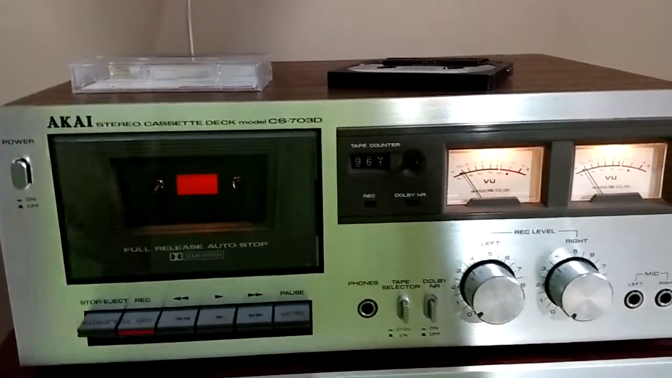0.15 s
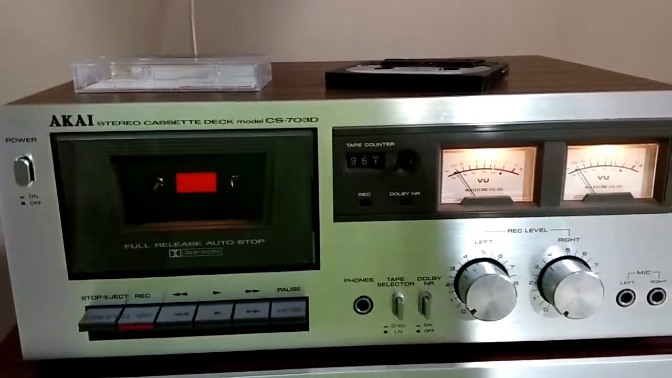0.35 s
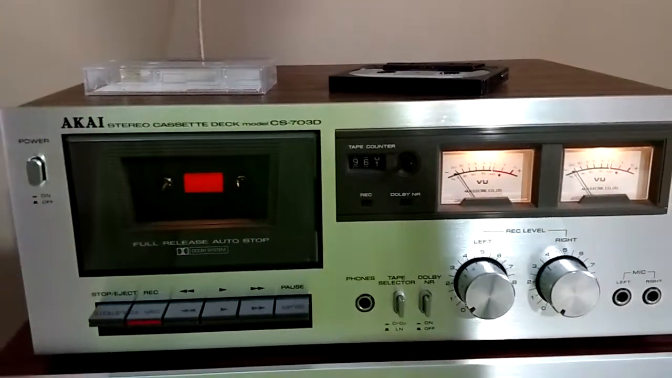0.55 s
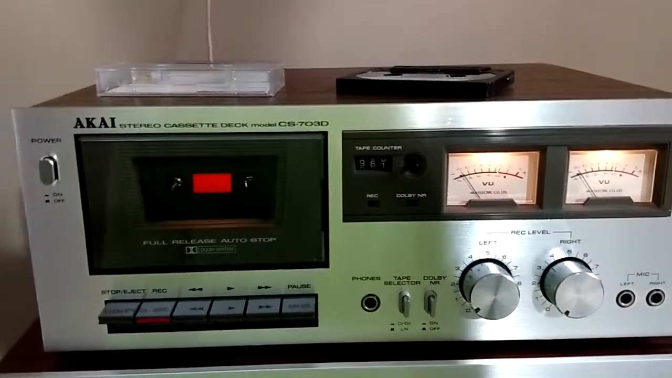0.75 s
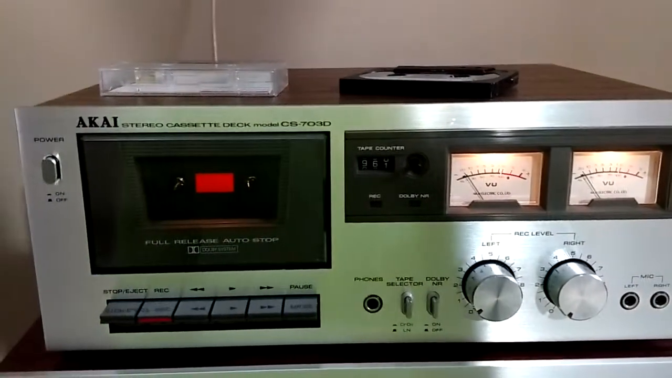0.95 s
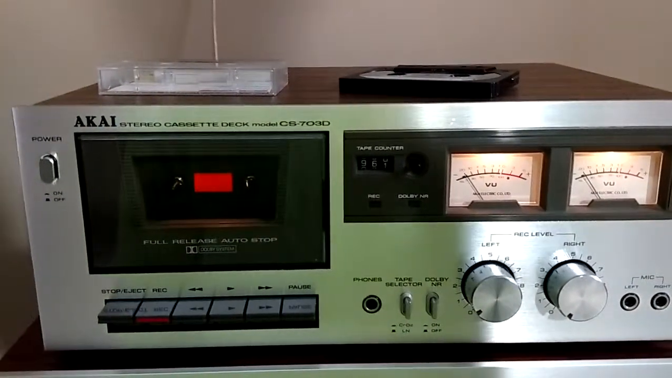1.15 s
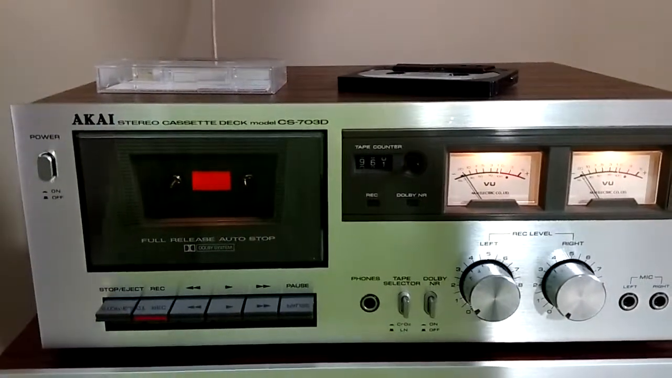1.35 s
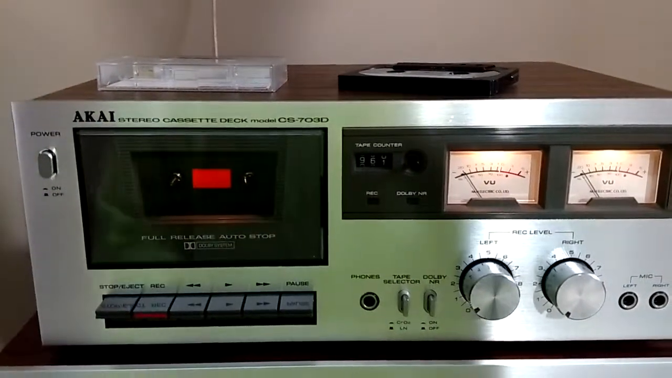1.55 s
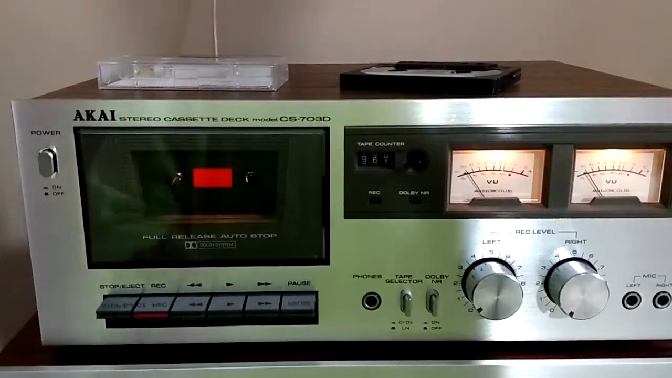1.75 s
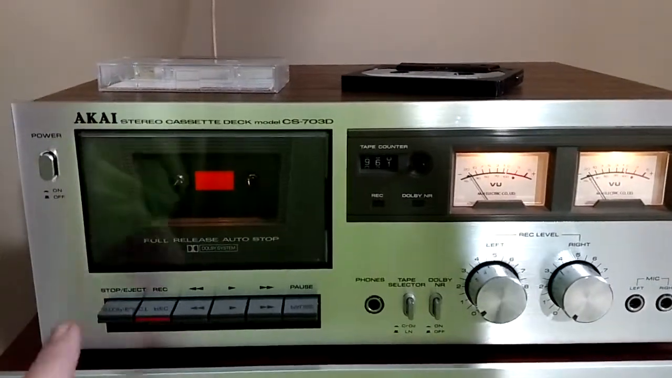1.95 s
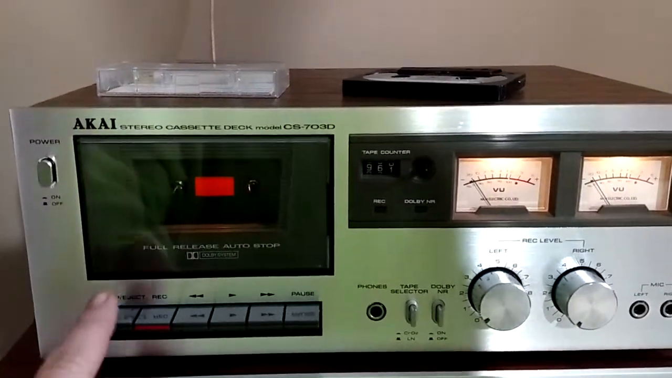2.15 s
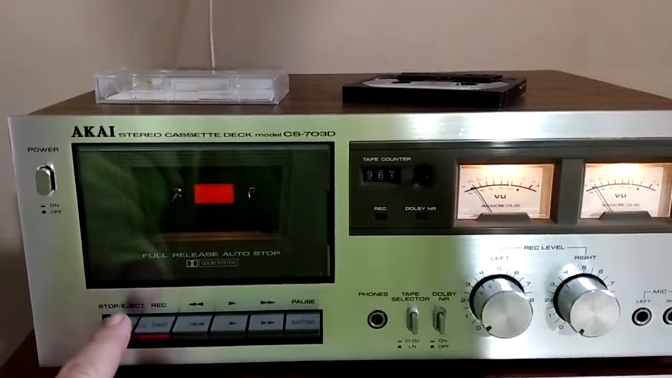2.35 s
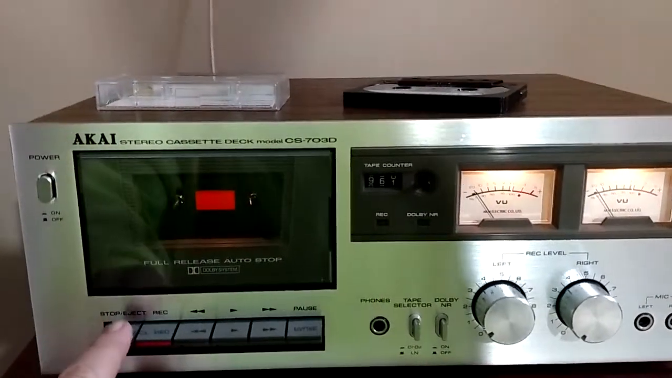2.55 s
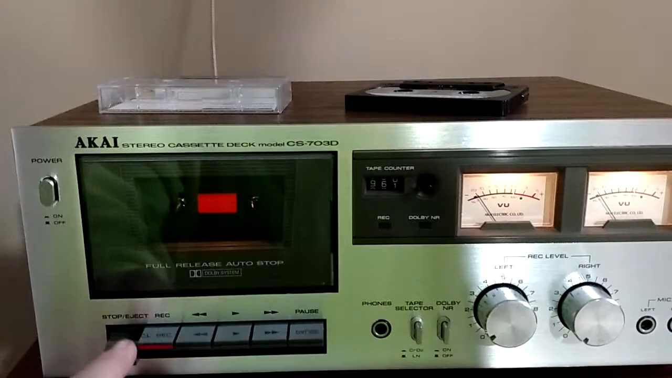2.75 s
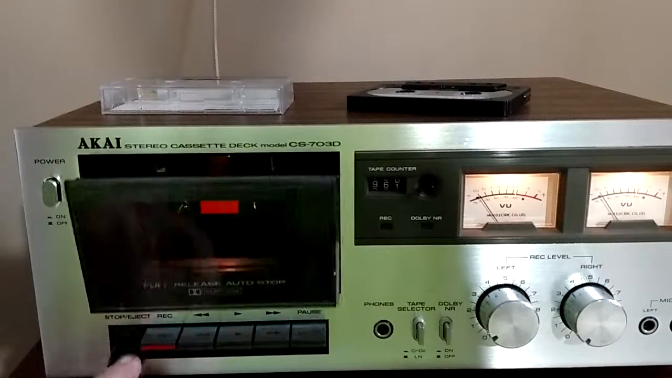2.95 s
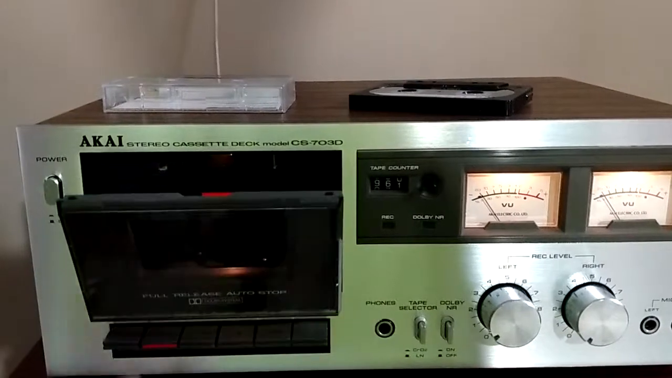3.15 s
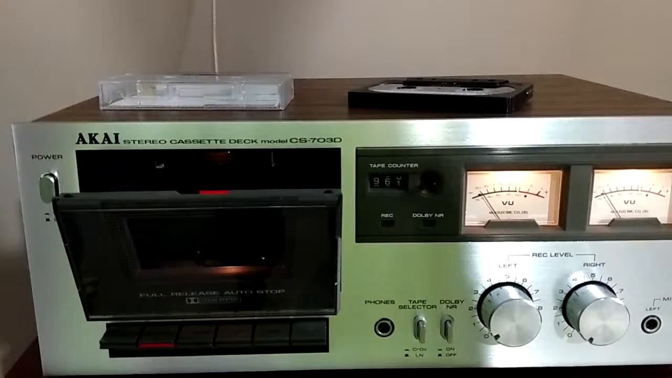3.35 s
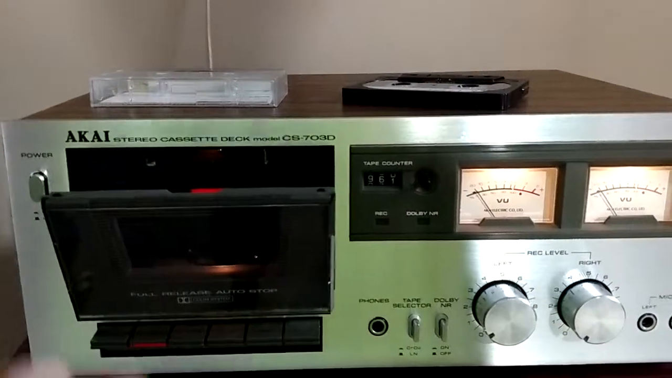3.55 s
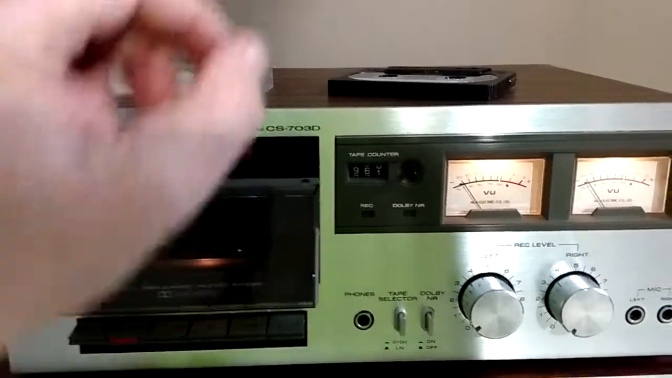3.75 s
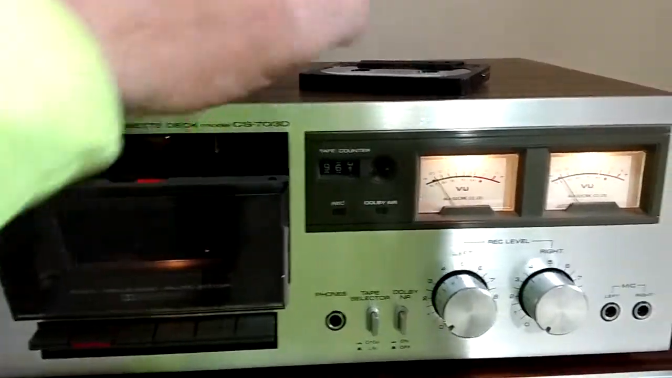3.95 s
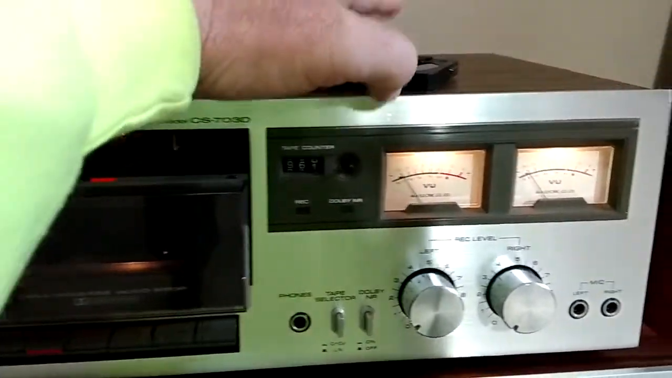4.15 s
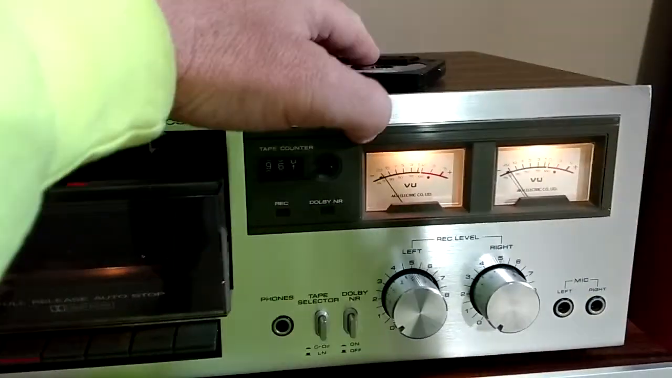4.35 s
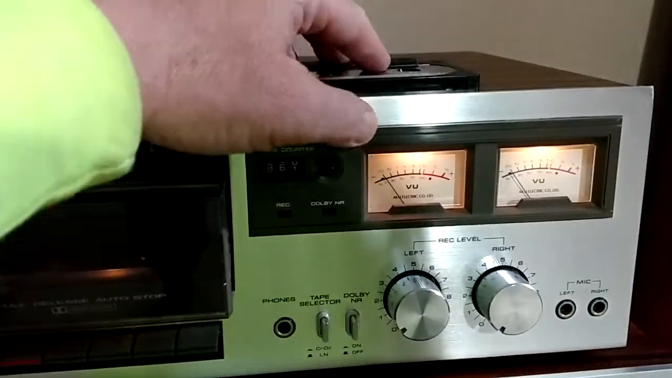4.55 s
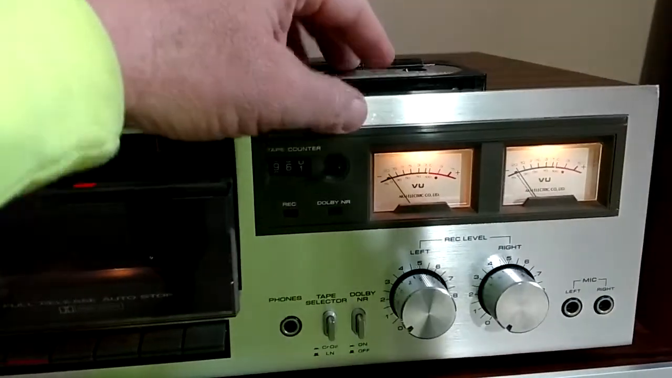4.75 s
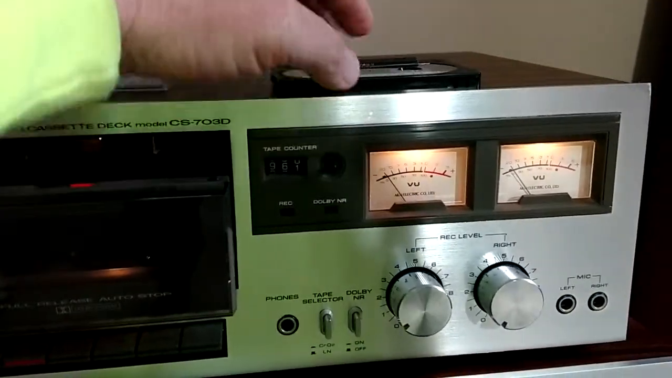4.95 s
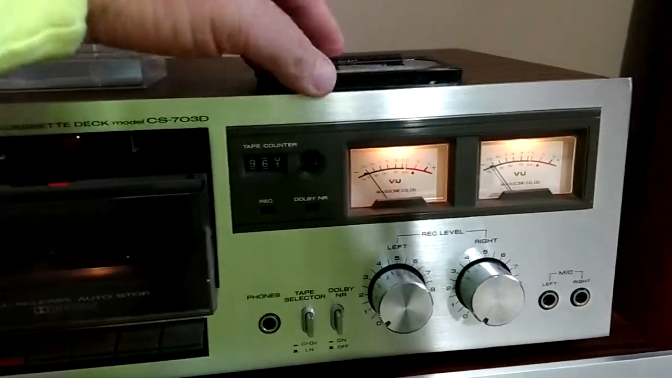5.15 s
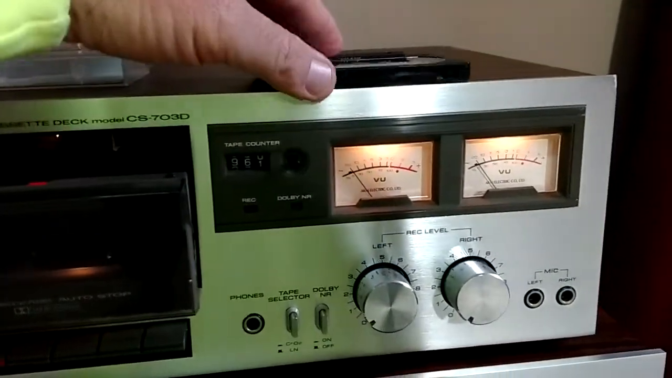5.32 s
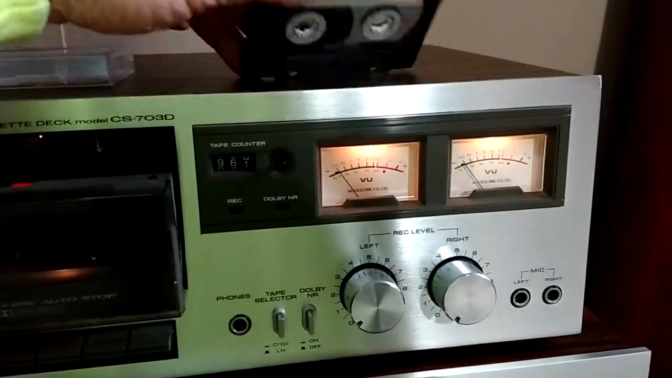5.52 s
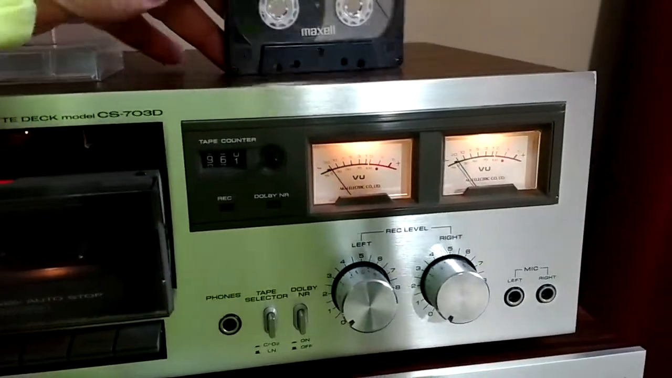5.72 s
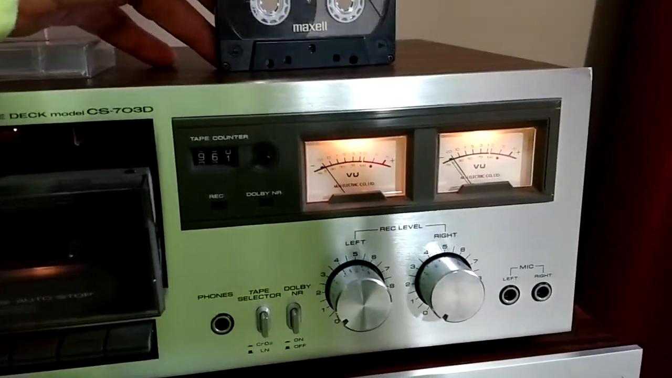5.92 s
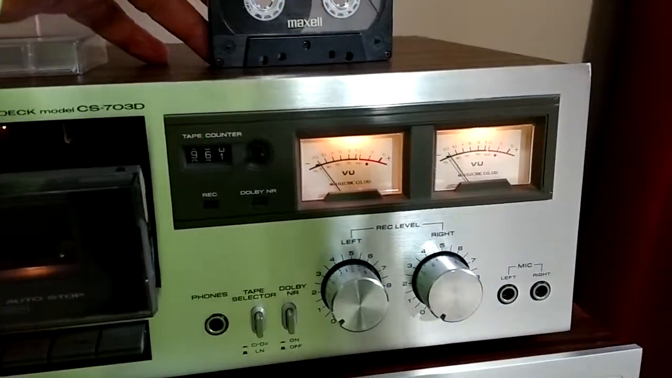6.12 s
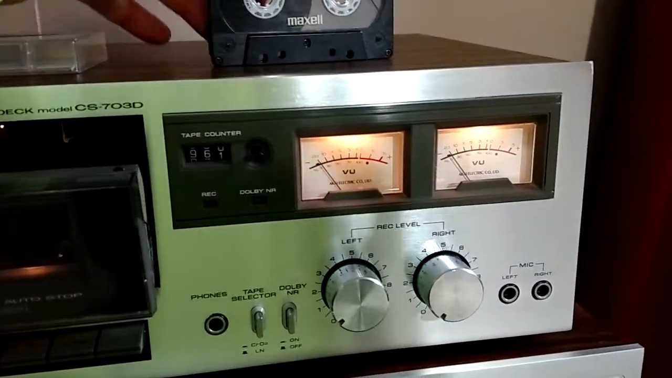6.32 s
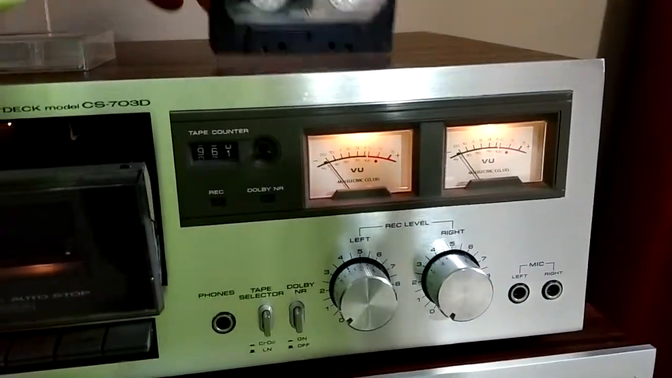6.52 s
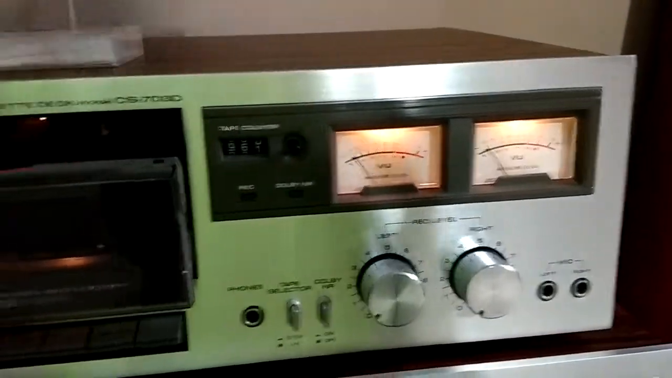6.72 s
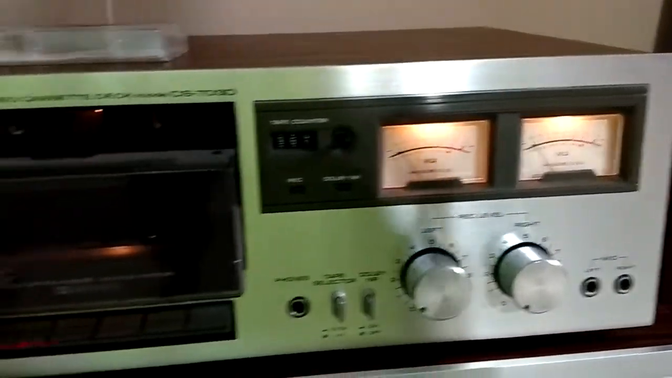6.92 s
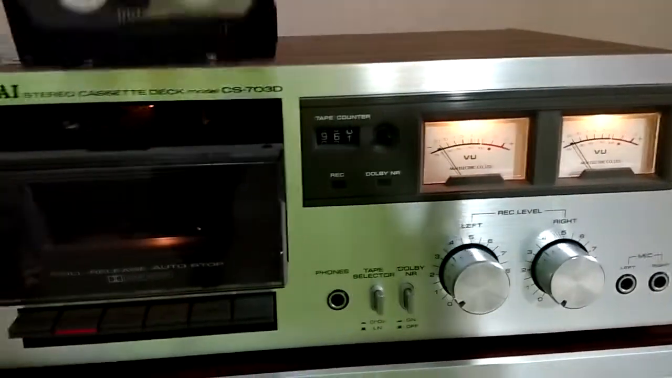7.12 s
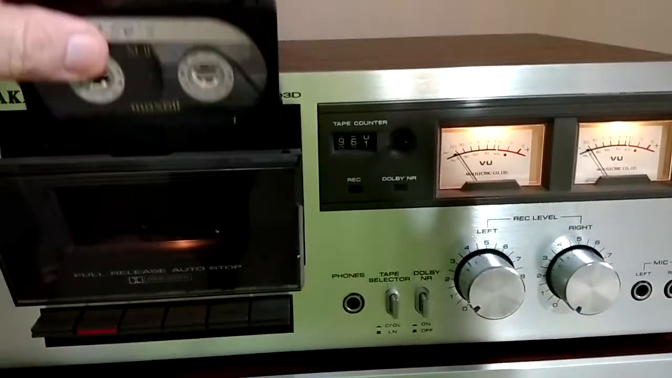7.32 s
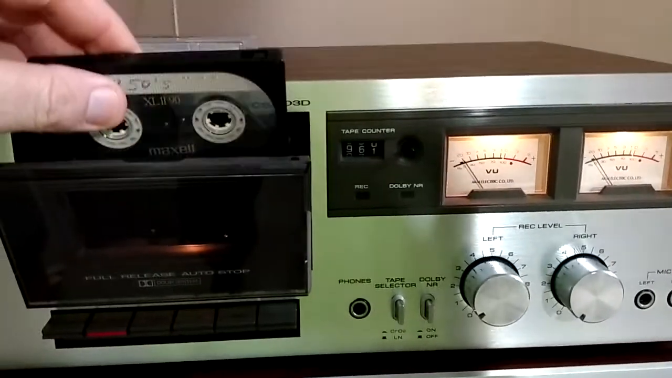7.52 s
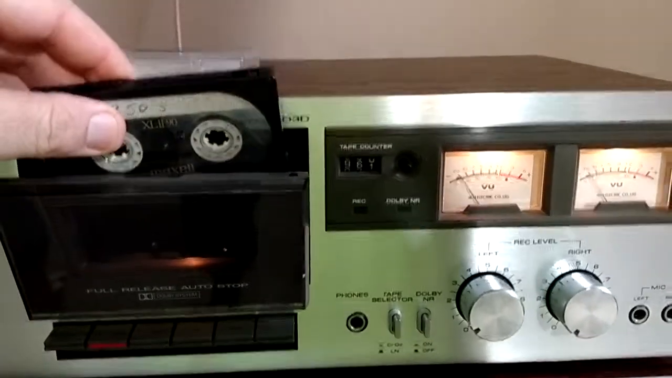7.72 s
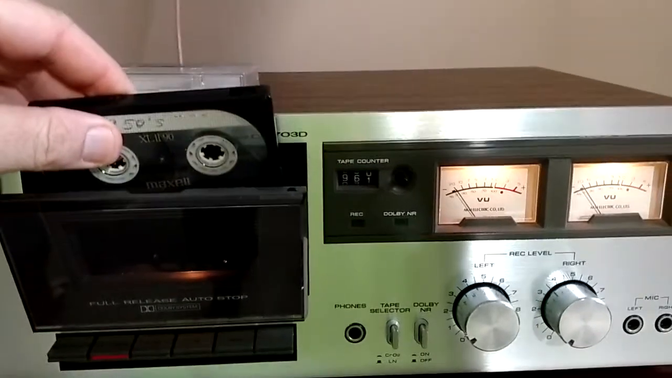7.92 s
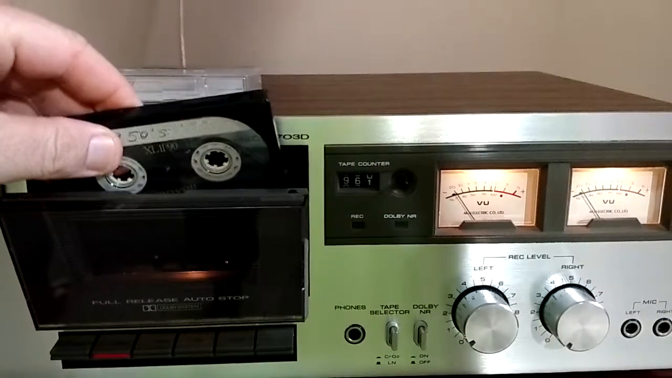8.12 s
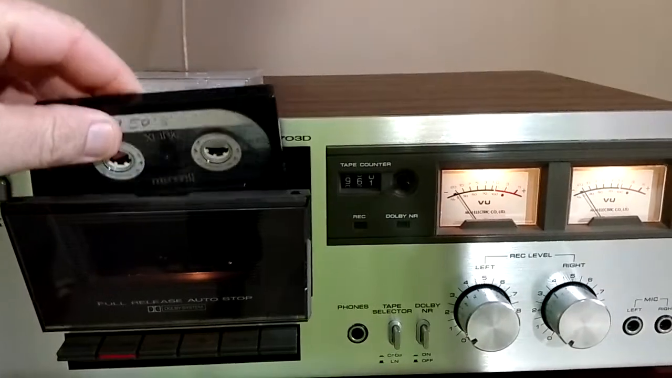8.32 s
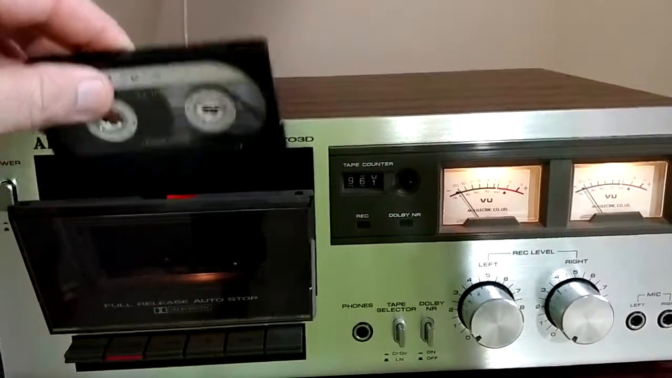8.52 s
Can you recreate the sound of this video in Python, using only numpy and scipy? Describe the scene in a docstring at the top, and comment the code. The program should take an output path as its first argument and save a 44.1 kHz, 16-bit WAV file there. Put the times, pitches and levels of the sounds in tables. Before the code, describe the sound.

Close, small indoor recording with soft air hiss and low hum. After nearly three quiet seconds a key clicks and a spring-loaded door clacks open sharply. A plastic box and cassette then knock and scrape loudly on the wooden cabinet top, followed by softer dull taps as the cassette rocks upright. After a short pause, it rattles and clicks lightly against the door guides.

```python
"""A quiet room with a tape deck: a key is pressed and the door drops open, a hand slides a box and a cassette
over the wooden top, rocks the cassette upright, then feeds it into the door. Air hiss and a low hum lie below.
Blows are grain bursts ringing modes, scrapes and rattling tails are grain streams, the background is shaped
noise and sines. Two microphone ports a hand's width apart are subtracted from each other to aim left and right."""
import sys
import numpy as np
from scipy import signal
from scipy.fft import rfft, irfft
from scipy.io import wavfile

SR = 44100
rng = np.random.default_rng(int(sys.argv[2]) if len(sys.argv) > 2 else 0)


def to_wav(s):
    """Save 16-bit WAV."""
    ch = np.atleast_2d(s).T  # columns
    pcm = np.round(np.clip(ch, -1, 1) * 32767)  # PCM
    wavfile.write(sys.argv[1], SR, pcm.astype(np.int16))


N = 378378
HZ = np.maximum(np.fft.rfftfreq(N, 1 / SR), 1)
TIME = np.arange(N) / SR


def amp(db):
    """Gain of a level in dB."""
    return 10 ** (np.asarray(db, float) / 20)


def rms_one(x):
    """Scaled to rms 1."""
    return x / np.sqrt(np.mean(x ** 2) + 1e-20)


def in_time(rows):
    """Columns of a table as straight-line curves over all samples."""
    s, *columns = np.transpose(rows)
    return np.array([np.interp(TIME, s, column) for column in columns])


def swell(start_s, rise_s, hold_s, fall_s):
    """Straight rise, hold and fall between 0 and 1."""
    corners_s = start_s + np.cumsum([0, rise_s, hold_s, fall_s])
    return np.interp(TIME, corners_s, [0, 1, 1, 0])


def coloured(spectrum, channels=1):
    """Steady noise of a given spectrum, rms 1."""
    hz, db = np.transpose(spectrum)
    shape = amp(np.interp(np.log(HZ), np.log(hz), db))
    white = rng.standard_normal((channels, N))
    return rms_one(irfft(rfft(white) * shape, N))


# Hiss of the air. Each row: time in seconds, level in dB.
AIR_LEVEL = [(0, -64.5), (.6, -64), (1.3, -68), (2.3, -70.5), (2.9, -66.5), (3.3, -66), (4.1, -63.5),
             (4.8, -62.5), (5.6, -61.5), (6.5, -65), (7.3, -68), (8.58, -61)]
# Hiss spectrum at each port. Each row: frequency in Hz, density in dB per Hz.
AIR_SPECTRUM = [(30, -12.5), (50, -18.5), (80, -0.5), (125, -2), (200, 2.5), (320, -2.5), (550, -0.5),
                (1000, -2.5), (1700, -5), (3000, -8.5), (5500, -9), (8500, -9), (12000, -10),
                (16000, -10.5)]


def air():
    """Hiss of the air, independent at each port."""
    air_db, = in_time(AIR_LEVEL)
    return amp(air_db) * coloured(AIR_SPECTRUM, channels=2)


# Rumble spectrum. Each row: frequency in Hz, density in dB per Hz.
RUMBLE_SPECTRUM = [(30, -34), (50, -2.5), (78, 5.5), (100, -1), (122, -6.5), (170, -16.5), (255, 4.5),
                   (330, -5), (500, -5.5), (900, -51)]
RUMBLE_DB, RUMBLE_FOLLOWS = -77.5, 1.3   # level at mean hiss; dB of swing per dB of hiss swing


def rumble():
    """Low noise, alike at both ports, that swings with the hiss."""
    air_db, = in_time(AIR_LEVEL)
    rumble_db = RUMBLE_DB + RUMBLE_FOLLOWS * (air_db - air_db.mean())
    return amp(rumble_db) * coloured(RUMBLE_SPECTRUM)


# Low background. Each row: time in seconds, drone level in dB, hum level in dB.
BACKGROUND_LEVELS = [(0, -84, -76.5), (1.3, -92.5, -84), (2.4, -83, -88), (3.1, -73.5, -88),
                     (4.3, -73, -86), (4.7, -75, -72), (5.5, -76, -66), (6.1, -71, -69),
                     (7.3, -72.5, -67.5), (7.8, -67.5, -63), (8.58, -63, -66)]
# Drone spectrum. Each row: frequency in Hz, density in dB per Hz.
DRONE_SPECTRUM = [(95, -35), (118, -5.5), (140, -5), (170, 0.5), (200, -9), (250, 0), (300, -57)]
# Hum partials. Each row: frequency in Hz, relative level in dB.
HUM_PARTIALS = [(124, 1), (248, -9), (366, -16.5)]


def drone_and_hum():
    """Narrow low noise plus steady sine partials, alike at both ports."""
    drone_db, hum_db = in_time(BACKGROUND_LEVELS)
    hum = sum(amp(db) * np.sin(2 * np.pi * hz * TIME) for hz, db in HUM_PARTIALS)
    return amp(drone_db) * coloured(DRONE_SPECTRUM) + amp(hum_db) * hum


# Faint high whine. Each row: time in seconds, frequency in Hz, level in dB.
WHINE = [(0, 11050, -86), (1.2, 10900, -88), (2.5, 10600, -91), (5, 10400, -87), (8.58, 10350, -89)]


def whine():
    """A thin high tone whose strength wavers at random, independently at each port."""
    hz, db = in_time(WHINE)
    waver = coloured([(1, -5), (60, -2.0), (150, -33.0), (400, -72.5)], channels=2)   # (Hz, dB per Hz)
    return amp(db) * waver * np.sin(2 * np.pi * np.cumsum(hz) / SR)


def ring(force, hz, t60_s):
    """One mode: a unit click sets a decaying sine of height 1 ringing."""
    r, w = amp(-60 / (t60_s * SR)), 2 * np.pi * hz / SR
    return signal.lfilter([0, np.sin(w)], [1, -2 * r * np.cos(w), r * r], force + 1e-18)


GRAINS_PER_S, GRAIN_SPREAD_DB = 3000, 4


def grains(size):
    """Tiny uneven impacts at random moments, rms 1."""
    sizes = amp(GRAIN_SPREAD_DB * np.minimum(rng.exponential(1, size), 4))
    signed = sizes * rng.choice([-1, 1], size)
    return rms_one(signed * (rng.random(size) < GRAINS_PER_S / SR))


def band(x, low_hz, high_hz):
    """Band-pass that keeps the rms of white noise."""
    sos = signal.butter(2, [low_hz, high_hz], "band", fs=SR, output="sos")
    return signal.sosfilt(sos, x) * np.sqrt(SR / 2 / (high_hz - low_hz))


def resonances(x, peaks):
    """Parallel broad resonances, scaled so that white noise about keeps its rms."""
    out = 0
    for k, (hz, width_hz, db) in enumerate(peaks):
        r, w = np.exp(-np.pi * width_hz / SR), 2 * np.pi * hz / SR
        peak = signal.lfilter([1 - r * r, 0, r * r - 1], [1, -2 * r * np.cos(w), r * r], x)
        out = out + (-1) ** k * amp(db) * peak
    power = sum(2 * np.pi * amp(db) ** 2 * width_hz * 2 / SR for hz, width_hz, db in peaks)
    return out / np.sqrt(power)


SPOT_DB_PER_OCTAVE, MODE_SPREAD_DB = 9.5, 1
RISE_S = 0.00044


def spot_gain(hz, db, spot_hz):
    """Modes near the pitch of the touched spot are driven most."""
    return amp(db - SPOT_DB_PER_OCTAVE * np.abs(np.log2(hz / spot_hz)))


def blows(hits, modes, levels_db, spots_hz, grip):
    """Each blow is a short rattle that swells and dies, ringing the modes of the struck body."""
    out, span_s = np.zeros(N + SR), np.arange(SR // 4) / SR
    for (s, *_, rattle_s), level_db, spot_hz in zip(hits, levels_db, spots_hz):
        force = grains(len(span_s)) * np.exp(-span_s / rattle_s) * (1 - np.exp(-span_s / RISE_S))
        force[:8] += np.hanning(8) * 1.48   # first contact
        chance = amp(rng.normal(0, MODE_SPREAD_DB, len(modes))) * rng.choice([-1, 1], len(modes))
        body = sum(own * spot_gain(hz, db, spot_hz) * ring(force, hz, t60_s)
                   for own, (hz, db, t60_s) in zip(chance, modes))
        body = body * np.exp(-span_s / (grip * rattle_s))   # fingers and guides damp the ring
        fade = np.cos(2 * np.pi * span_s)   # reaches 0 at the end of the span
        out[round(s * SR):][:len(span_s)] += amp(level_db) * body / np.abs(body).max() * fade
    return out[:N]


# Broad upper resonances of thin plastic. Each row: frequency in Hz, width in Hz, level in dB.
CLICK_PEAKS = [(2310, 1400, -1), (3520, 774, 1), (4164, 1010, -2), (5100, 820, -3.5), (5595, 590, -11.5)]
# The same, higher up. Each row: frequency in Hz, width in Hz, level in dB.
TICK_PEAKS = [(6790, 890, 0.5), (9270, 1400, 6), (10300, 2740, 2.5), (11800, 1200, 3.5), (14200, 4400, -6)]


def cracks(hits):
    """The bright edge of each blow: noise dying with the rattle, in a click band and a tick band."""
    click, tick, span_s = np.zeros(N + SR), np.zeros(N + SR), np.arange(SR // 8) / SR
    for s, level_db, _, click_db, tick_db, _, rattle_s in hits:
        part = slice(round(s * SR), round(s * SR) + len(span_s))
        click[part] += amp(level_db + click_db - 1.5) * np.exp(-span_s / (0.00039 + 0.49 * rattle_s))
        tick[part] += amp(level_db + tick_db - 6) * np.exp(-span_s / (0.0023 + 0.27 * rattle_s))
    rough = 3.06 * rng.standard_normal(N) + 1.58 * grains(N)
    return resonances(click[:N] * rough, CLICK_PEAKS) + resonances(tick[:N] * rough, TICK_PEAKS)


# Modes of the wooden cabinet. Each row: frequency in Hz, level in dB, t60 in seconds.
CABINET_MODES = [(180.4, -2, 0.1), (201.5, 0.5, 0.24), (251, -6.5, 0.77), (276.5, 0, 0.31),
                 (313.4, 4, 0.13), (410, -11.5, 0.049)]
BODY_GRIP, WOOD_GRIP = 2.9, 25   # ring time allowed, in rattle lengths


def knocks(hits, wood_hz, modes):
    """Body, wooden cabinet and crack of one family of blows; wood_hz is where the cabinet answers."""
    s, level_db, boom_db, _, _, spot_hz, _ = np.transpose(hits)
    body = blows(hits, modes, level_db, spot_hz, BODY_GRIP)
    wood = blows(hits, CABINET_MODES, level_db + boom_db, np.full(len(s), wood_hz), WOOD_GRIP)
    boom = band(wood, 140, 450) / 8.75   # the wood answers softly
    return .5 * body + .5 * boom + cracks(hits)


SMALL_BODY_HZ = 154.3


def small_body(x):
    """High-pass: small bodies give no deep bass."""
    return signal.sosfilt(signal.butter(4, SMALL_BODY_HZ, "high", fs=SR, output="sos"), x)


# Key and door. Each row: start in seconds, level in dB, cabinet boom, click and tick in dB re that level,
# spot pitch in Hz, rattle decay in seconds.
DECK_HITS = [(2.675, -44, -35, -7.5, -11.5, 760, 0.0059), (2.76, -44, -10, -2.5, -2, 744, 0.005),
             (2.802, -37.5, -14, -9.5, -8.5, 770, 0.0015), (2.86, -46, -15, -5, -8, 910, .003),
             (2.891, -36.5, -10, -24, -14, 750, 0.0035), (2.911, -24, -19, -26, -32, 1200, 0.0012),
             (2.985, -53.5, -2, -10, -3, 1320, 0.0027), (3.053, -34.5, -27, -28, -23, 1340, 0.0033),
             (3.073, -24, -20, -9, -13, 877, .003), (3.085, -18, -24, -8.5, -14, 780, 0.0048),
             (3.091, -28.5, -28, -4, 6, 740, 0.0013), (3.124, -28.5, -14, -17, -15, 1360, .0025),
             (3.15, -32.5, -7.5, -27, -25, 1200, 0.0028), (3.17, -50.5, 7.5, -28, -32, 1240, 0.0034)]
# Modes of the door. Each row: frequency in Hz, level in dB, t60 in seconds.
DOOR_MODES = [(540, -19, 0.06), (742, -9.5, 0.13), (925, -11, 0.11), (1020, -24, 0.038),
              (1210, -5.5, 0.049), (1320, -4.5, 0.05), (1437, -8, 0.065), (1510, 3.5, 0.015),
              (1870, -18, 0.041)]
DECK_WOOD_HZ = 243
DECK_SHEEN_HZ, DECK_SHEEN_DB = 9400, -4.5


def key_and_door():
    """Blows ring the door modes; metal latch parts add top treble."""
    door = small_body(knocks(DECK_HITS, DECK_WOOD_HZ, DOOR_MODES))
    sheen = signal.sosfilt(signal.butter(2, DECK_SHEEN_HZ, "high", fs=SR, output="sos"), door)
    return door + amp(DECK_SHEEN_DB) * sheen


SCRAPE_RISE_S, SCRAPE_FALL_S, SCRAPE_SILENT_DB = .006, 0.0091, -21.5


def scrape_gains(s, length_s, start_db, end_db, boom_db, click_db, tick_db):
    """Gains of the four layers of one scrape or tail: quick rise, even drift in dB, short fall."""
    times_s = s + np.array([-SCRAPE_RISE_S, 0, length_s, length_s + SCRAPE_FALL_S])
    levels_db = [start_db + SCRAPE_SILENT_DB, start_db, end_db, end_db + SCRAPE_SILENT_DB]
    body = amp(np.interp(TIME, times_s, levels_db, left=-140, right=-140))
    return body * amp([[0], [boom_db], [click_db], [tick_db]])


# Scrapes and rattling tails of the door, the box and the cassette. Each row: start in seconds, length in seconds,
# level in dB at start and at end, boom, click and tick in dB re that level, spot pitch in Hz at start and at end.
SCRAPES = [(2.836, .065, -52, -61, -15, -10, -17, 1000, 1050),
           (2.869, 0.013, -49.5, -64, -7, -4.5, 8, 836, 930),
           (3.046, 0.042, -56.5, -34, -22, -3, -16, 1110, 700),
           (3.098, 0.094, -42, -58, -11.5, -12.5, -22, 900, 1250),
           (4.296, 0.043, -34.5, -44, -10, -11, -16.5, 1000, 1300),
           (4.342, 0.12, -39, -38, -10, -5.5, -8.5, 1080, 1660),
           (4.486, .12, -35.5, -36, -11.5, -6, -9, 920, 440),
           (4.619, 0.1, -42, -55.5, 0, -14, -9.5, 840, 510),
           (5.035, 0.053, -54.5, -55.5, -2.5, -9, -15.5, 1050, 520),
           (5.204, 0.043, -42, -31, -9, -8.5, -12, 855, 1300),
           (5.246, 0.14, -49.5, -59, 1.5, -8, -14, 900, 840),
           (5.521, .18, -70, -67, 2.5, -2, 6.5, 1050, 950),
           (7.421, 0.11, -48.5, -52, -10, -8.5, -5.5, 1020, 1600),
           (7.558, 0.072, -55, -76, 5.5, -15.5, -2, 1140, 760),
           (7.836, .06, -64.5, -64, -4.5, -9, 2, 933, 810),
           (8.048, 0.022, -55, -70, 4, -16, -10.5, 1000, 850),
           (8.072, 0.036, -71, -53.5, 3.5, -5.5, 5.5, 1050, 820),
           (8.116, 0.082, -59.5, -65, 2.5, -10.5, -2.5, 980, 910),
           (8.277, 0.075, -58.5, -50.5, -4, -10.5, 1.5, 930, 1030),
           (8.341, 0.079, -42, -44.5, -8, -6, -6.5, 980, 900),
           (8.429, 0.091, -42, -59.5, -8, -10.5, -10, 1200, 780)]
# Modes of the plastic shell. Each row: frequency in Hz, level in dB, t60 in seconds.
SHELL_MODES = [(495, -30, 0.094), (620, -5.5, 0.022), (735, 0.5, 0.024), (783, 1.5, 0.036),
               (906, -8, 0.036), (1040, 4, 0.017), (1175, 8.5, 0.013), (1387, -0.5, 0.013),
               (1539, 8.5, 0.012), (2031, 3.5, 0.035), (2250, -21, .03)]


def scrapes_and_tails():
    """Dense grains drive shell and cabinet modes and hiss in the treble."""
    body, boom, click, tick = sum(scrape_gains(*row[:-2]) for row in SCRAPES)
    points = []
    for s, length_s, *_, start_hz, end_hz in SCRAPES:
        points += [(s, start_hz), (s + length_s, end_hz)]
    spot_hz, = in_time(sorted(points))
    near = np.array([spot_gain(hz, db, spot_hz) for hz, db, _ in SHELL_MODES])
    shell = sum(gain * rms_one(ring(grains(N), hz, t60_s)) for gain, (hz, _, t60_s) in zip(near, SHELL_MODES))
    shell = shell / np.sqrt(np.sum(near ** 2, axis=0))
    rub = grains(N)
    wood = rms_one(sum(amp(db) * ring(rub, hz, t60_s) for hz, db, t60_s in CABINET_MODES))
    hiss = 0.61 * rng.standard_normal(N) + 1.39 * rub
    treble = resonances(click * hiss, CLICK_PEAKS) + resonances(tick * hiss, TICK_PEAKS)
    return .5 * body * shell + .5 * boom * wood + treble


# Thin metal parts that ring on. Each row: start in seconds, frequency in Hz, level in dB, t60 in seconds.
RINGS = [(3.09, 1219, -76, 4.4), (8.42, 4890, -67, 0.49)]


def metal_ring(row):
    """One long ring from one blow."""
    s, hz, db, t60_s = RINGS[row]
    blow = 1. * (np.arange(N) == round(s * SR))
    return amp(db) * ring(blow, hz, t60_s)


LOW_TONE_S, LOW_TONE_HZ, LOW_TONE_DB, LOW_GLIDE_HZ_PER_S = 3.45, 174, -64, 90
LOW_RISE_S, LOW_HOLD_S, LOW_FALL_S = 0.028, .12, 0.1


def low_tone():
    """A short low sine that climbs a little."""
    hz = LOW_TONE_HZ + LOW_GLIDE_HZ_PER_S * (TIME - LOW_TONE_S)
    envelope = swell(LOW_TONE_S, LOW_RISE_S, LOW_HOLD_S, LOW_FALL_S)
    return amp(LOW_TONE_DB) * envelope * np.sin(2 * np.pi * np.cumsum(hz) / SR)


# Box and cassette on the wooden top. Each row: start in seconds, level in dB, cabinet boom, click and tick
# in dB re that level, spot pitch in Hz, rattle decay in seconds.
TOP_HITS = [(4.264, -41.5, 0.5, -18, -16, 1070, 0.017), (4.285, -32, -2, -5, -13, 1040, 0.0039),
            (4.296, -26.5, -21, -5, -7, 1040, 0.0031), (4.309, -23.5, -5.5, -34, -33, 970, 0.0091),
            (4.462, -9, -20.5, -22, -25, 970, 0.0068), (4.472, -21, -20, -4.5, -10.5, 1040, 0.0076),
            (4.571, -21, -3.5, -22, -28, 703, 0.0031), (4.612, -11, -23.5, -15, -17, 830, 0.0055),
            (5.063, -35, -14, -30, -22, 1140, 0.0087), (5.099, -41.5, -24, -30, -27, 1200, 0.0021),
            (5.193, -31, -34, -16.5, -26, 820, 0.0098), (5.226, -22.5, -3, -25, -24, 795, 0.0021),
            (5.234, -26, -7, -1.5, -17, 824, 0.0056), (5.244, -24.5, -15, -28, -27, 760, 0.0067),
            (5.475, -42, -15, -10, -25, 1470, 0.0027), (5.484, -24, -21, -18, -29, 1530, 0.0013),
            (5.79, -40.5, 0, -36, -28, 750, 0.02), (6.513, -44.5, 2, -22, -14.5, 630, 0.035),
            (6.545, -38, -3, -26, -25, 960, 0.017)]
TOP_WOOD_HZ = 204


def top_knocks():
    """Box and cassette knock on the wood and ring the shell modes."""
    return knocks(TOP_HITS, TOP_WOOD_HZ, SHELL_MODES)


# Partials of the throb. Each row: multiple of the throb rate, relative level in dB.
THROB_ORDERS = [(8, -4), (9, -9), (10, 8), (11, 9), (12, -15), (13, 6)]
THROB_HZ, THROB_DB = 13, -65.5
THROB_S, THROB_LENGTH_S, THROB_EDGE_S = 4.6, 1.68, .12


def throb():
    """As of a slow motor: neighbouring multiples of one rate beat into a pulse that glides in pitch."""
    orders = 0
    for k, db in THROB_ORDERS:
        phase = 0.39 * (k - 10) ** 2 + 1.45 * k   # the square term spreads the partials over the pulse
        orders = orders + amp(db) * np.cos(2 * np.pi * k * THROB_HZ * TIME + phase)
    envelope = swell(THROB_S, THROB_EDGE_S, THROB_LENGTH_S, THROB_EDGE_S)
    return amp(THROB_DB) * envelope * rms_one(orders)


# Deep soft thuds. Each row: start in seconds, frequency in Hz, level in dB, swell time in seconds.
THUDS = [(5.501, 70.5, -51, 0.026), (5.6, 71.2, -58, 0.02)]


def thuds():
    """Low sines that swell and fade."""
    out = np.zeros(N)
    for s, hz, db, swell_s in THUDS:
        age = np.maximum(TIME - s, 0) / swell_s
        out += amp(db) * age * np.exp(1 - age) * np.sin(2 * np.pi * hz * TIME)
    return out


# Cassette rocking on its edge. Each row: start in seconds, level in dB, spot pitch in Hz.
ROCKS = [(5.712, -46.5, 756), (5.971, -45, 676), (6.055, -43.5, 501), (6.145, -47, 635),
         (6.226, -44.5, 568), (6.305, -51, 750), (6.381, -49, 500), (6.448, -54, 790)]
ROCK_BOOM_DB, ROCK_CLICK_DB, ROCK_TICK_DB = 5.5, -26, -33   # re the level of each rock
ROCK_RATTLE_S, ROCK_WOOD_HZ = 0.0088, 262


def rocks():
    """Dull woody blows: strong cabinet boom, little click or tick."""
    hits = [(s, db, ROCK_BOOM_DB, ROCK_CLICK_DB, ROCK_TICK_DB, hz, ROCK_RATTLE_S) for s, db, hz in ROCKS]
    return knocks(hits, ROCK_WOOD_HZ, SHELL_MODES)


# Cassette in the door guides. Each row: start in seconds, level in dB, cabinet boom, click and tick
# in dB re that level, spot pitch in Hz, rattle decay in seconds.
GUIDE_HITS = [(7.418, -36.5, -20, -14, -9, 1090, 0.0059), (7.55, -29.5, -15.5, -13, -14, 1130, 0.0035),
              (7.679, -64, -10, -4, 5, 900, .002), (7.767, -41, -11, -22, -27, 1160, 0.0029),
              (7.843, -57, -13, -9, 15, 961, 0.0033), (7.939, -57, -25, -8, 13, 1200, .006),
              (8.029, -25.5, -14.5, -17, -9, 1280, 0.0084), (8.039, -56, -13, -12, -11, 1240, 0.0032),
              (8.074, -32.5, -10, -24, -20, 1210, .002), (8.113, -41.5, -27, -24, -14, 1260, 0.0036),
              (8.216, -54, 4.5, -10, 19.5, 1210, .003), (8.337, -32, -10, -11.5, -3.5, 970, 0.01),
              (8.391, -35, -10, -18, -8, 1170, 0.0033), (8.401, -31, -1, -5, 7, 1250, .008),
              (8.415, -24.5, -25, -14, -18, 1280, 0.0028), (8.438, -32.5, -22, -22, -11, 1120, 0.0073)]
GUIDE_WOOD_HZ = 209


def guide_touches():
    """The cassette touches the door guides and rings its shell modes."""
    return knocks(GUIDE_HITS, GUIDE_WOOD_HZ, SHELL_MODES)


def decaying_noise(channels, size, t60_s, from_s=-1):
    """Spectra of noise tails of unit energy."""
    t = TIME[:size]
    tail = rng.standard_normal((channels, size)) * amp(-60 * t / t60_s) * (t > from_s)
    return rfft(tail / np.sqrt(np.sum(tail ** 2, axis=1, keepdims=True)), N)


DECK_LAG_S, SHELL_LAG_S = .00017, .000165
EVEN_BASS_HZ, SHADOW_HZ = 851, 10500   # bass bends round to both ports at once; left is duller above
ROOM_T60_S, ROOM_DB, ROOM_DULL_HZ, ROOM_ALIKE_HZ = 0.13, -4.5, 4000, 1200
PANEL_T60_S, PANEL_DB, PANEL_HZ = 0.0035, -3, 1800


def at_ports(x, lag_s):
    """Direct sound, later and duller on the left, front panel echoes and a short room tail."""
    lag = np.exp(-2j * np.pi * HZ * lag_s / (1 + (EVEN_BASS_HZ / HZ) ** 4))
    left = lag / np.sqrt(1 + (HZ / SHADOW_HZ) ** 6)
    direct = np.array([left, np.ones_like(left)])
    tail = decaying_noise(3, SR // 2, ROOM_T60_S, from_s=.0015) / (1 + 1j * HZ / ROOM_DULL_HZ)
    alike = 1 / (1 + (HZ / ROOM_ALIKE_HZ) ** 2)   # the tail differs between ports in the treble
    room = np.sqrt(alike) * tail[2] + np.sqrt(1 - alike) * tail[:2]
    panel = decaying_noise(2, SR // 20, PANEL_T60_S) / (1 + PANEL_HZ / (1j * HZ)) ** 2   # quick, bright
    return irfft(rfft(x) * (direct * (1 + amp(PANEL_DB) * panel) + amp(ROOM_DB) * room), N)


def scene():
    """Sound at the two microphone ports."""
    background = air() + rumble() + drone_and_hum() + whine() + throb()
    deck = key_and_door() + metal_ring(0) + low_tone() + thuds()
    hand = small_body(scrapes_and_tails() + top_knocks() + rocks() + guide_touches()) + metal_ring(1)
    return at_ports(deck, DECK_LAG_S) + at_ports(hand, SHELL_LAG_S) + background


AIM_DELAY_S, AIM_GAIN, AIM_FADE_HZ = 22 / 48000, 0.89, 6820
LIFT_HZ, LIFT_END_HZ, CUTOFF_HZ = 679, 60.4, 15900


def record(dry):
    """Each port minus the delayed other one, the lost bass lifted back, the top cut."""
    ports = rfft(dry)
    cross = AIM_GAIN * np.exp(-2j * np.pi * HZ * AIM_DELAY_S) / (1 + (HZ / AIM_FADE_HZ) ** 6)
    lift = (1j * HZ + LIFT_HZ) / (1j * HZ + LIFT_END_HZ)
    aimed = irfft((ports - cross * ports[::-1]) * lift, N)
    return signal.sosfilt(signal.ellip(10, .5, 60, CUTOFF_HZ, fs=SR, output="sos"), aimed)


dry = scene()
out = record(dry)
to_wav(out)
```